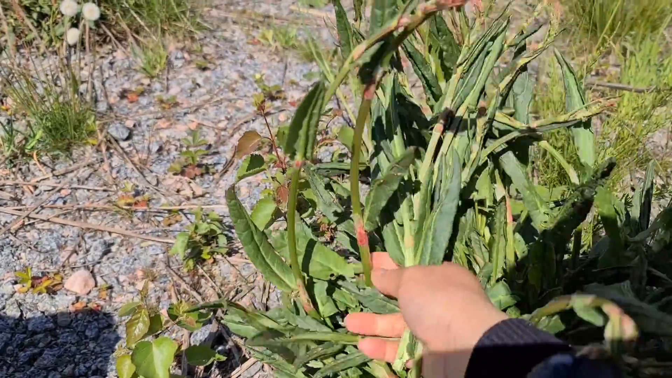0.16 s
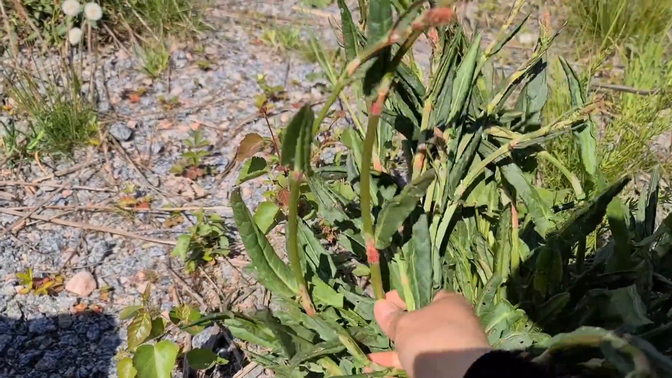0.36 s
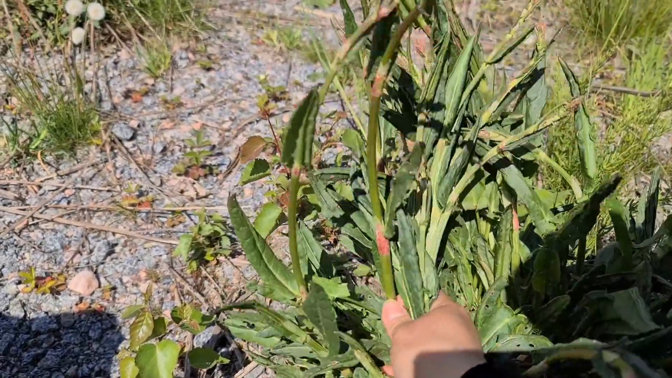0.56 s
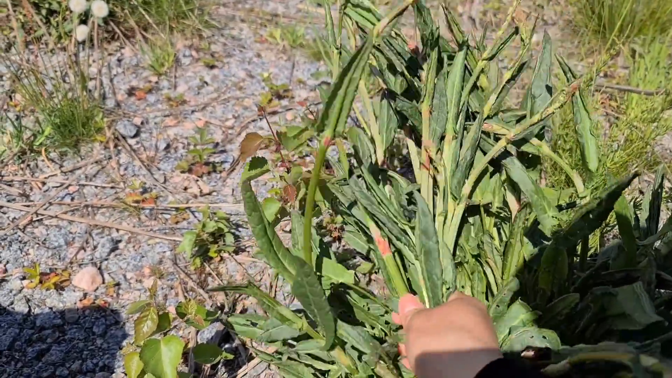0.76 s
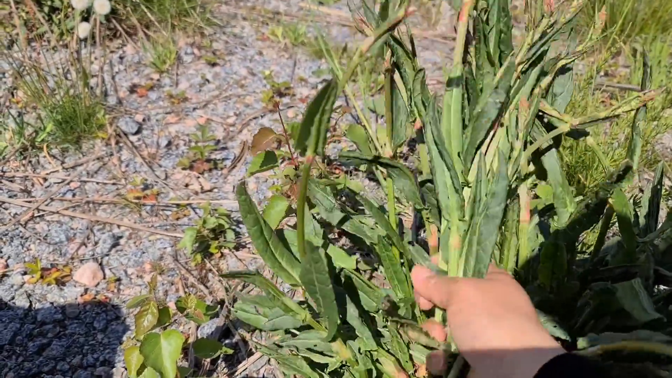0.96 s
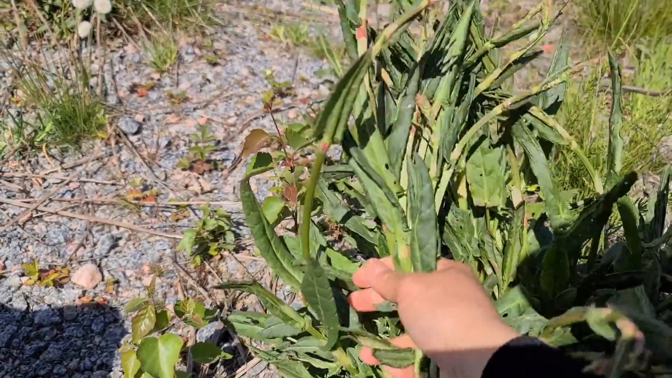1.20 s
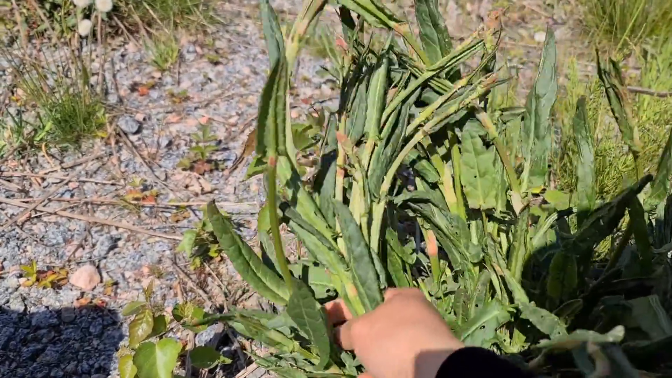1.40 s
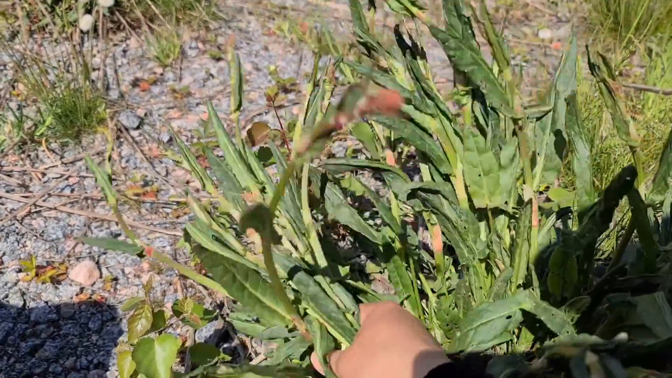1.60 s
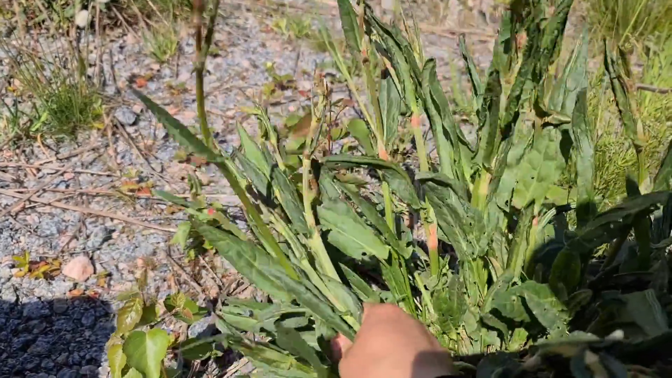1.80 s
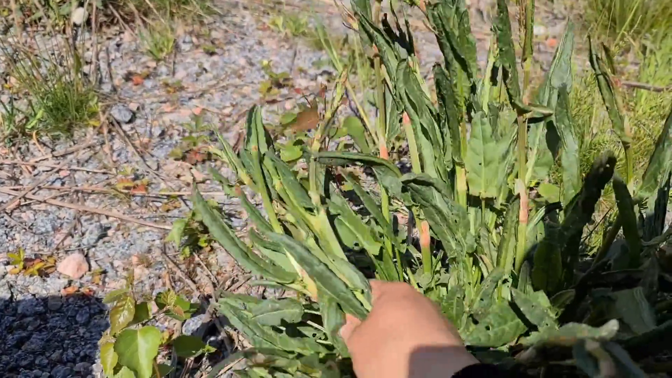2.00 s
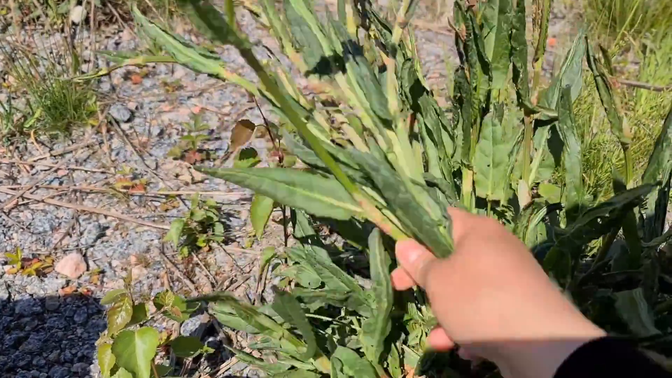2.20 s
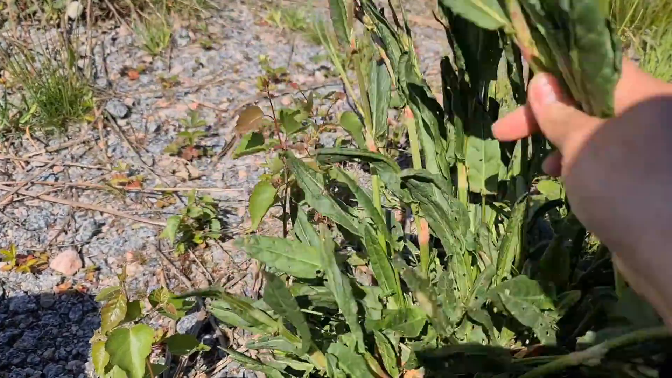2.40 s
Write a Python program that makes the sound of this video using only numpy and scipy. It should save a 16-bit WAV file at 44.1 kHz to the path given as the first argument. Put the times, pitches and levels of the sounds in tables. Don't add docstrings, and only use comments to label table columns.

```python
import sys
import numpy as np
from scipy import signal
from scipy.fft import rfft, irfft
from scipy.io import wavfile
from scipy.ndimage import uniform_filter1d

SR = 44100
rng = np.random.default_rng(int(sys.argv[2]) if len(sys.argv) > 2 else 0)


def wav_out(sig):
    wavfile.write(sys.argv[1], SR, np.round(np.clip(np.atleast_2d(sig).T, -1, 1) * 32767).astype(np.int16))


def convert_level_to_amplitude(level_db):
    exponent = np.asarray(level_db, float) / 20
    return 10 ** exponent


N = 110250

# pitch_hz, level_db (per Hz)
TRAFFIC_SPECTRUM = [(30, -17.5), (52, -3), (160, -3.5), (300, -11.5), (480, -12), (1000, -25.5),
                    (2000, -25), (3200, -43.5)]
# pitch_hz, level_db (per Hz)
FOLIAGE_SPECTRUM = [(2000, -6), (3500, 8), (5000, -1), (7000, -24), (9000, 3), (11000, -1), (13000, -10),
                    (15000, -17.5)]
# peak_s, rise_s, fall_s, level_db, tilt_db (per octave)
BRUSHES = [(0.102, 0.083, 0.3, -62, 3.5), (.21, 0.028, 0.041, -58, -1.5), (.34, 0.022, 0.015, -50, 1.5),
           (0.736, 0.021, 0.015, -38, 4), (.78, 0.029, 0.0081, -48, -0.5), (.88, 0.025, 0.013, -47.5, -0.5),
           (1.03, 0.042, 0.07, -57, -3.5), (1.51, .05, 0.058, -54.5, -5.5), (1.6, 0.042, 0.032, -45, 2),
           (1.69, 0.035, 0.047, -65, -14.5), (1.84, 0.041, 0.014, -55.5, -1),
           (1.89, 0.018, 0.033, -57.5, -4.5), (1.939, 0.015, 0.027, -53.5, -6),
           (2.14, 0.043, .04, -48, -0.5), (2.2, 0.018, 0.088, -60, -11), (2.26, 0.022, 0.027, -46, 2.5),
           (2.362, 0.023, 0.013, -50, -0.5)]
# start_s, level_db, length_s, left_right_db
TICKS = [(0.247, -51, 0.0017, 1), (0.261, -39, 0.0013, 3.5), (.315, -50, 0.0031, -2),
         (0.33, -66, 0.0018, -1.5), (0.703, -37.5, 0.0041, -7), (0.728, -49, 0.0025, -3),
         (0.742, -53, 0.0034, -11), (0.896, -49, 0.0036, 0.5), (1.034, -50.5, 0.001, -6),
         (1.078, -57, 0.0049, -1), (1.124, -64, .004, 2), (1.524, -57, 0.00094, -2),
         (1.61, -54, 0.0017, -10), (1.762, -44, 0.0011, 4), (1.783, -57, 0.0021, 4),
         (1.916, -48, 0.0026, 7), (2.058, -37, 0.0036, 3.5), (2.138, -52, 0.0024, 10),
         (2.268, -53, 0.003, 9), (2.371, -50, 0.0038, 6)]
# pitch_hz, level_db (per Hz)
LEAF_SPECTRUM = [(1470, -21), (2500, -5.5), (3300, -7.5), (4800, -5.5), (7170, -7), (8950, -1.5),
                 (15500, -8.5)]
# start_s, level_db, pitch_factor, left_right_db, push_length_factor
THICK_POP = [(.2429, 0.69, 1.007, -1.64, 1.045)]
# pitch_hz, level_db, t60_s, left_right_db
THICK_STEM = [(276, -20, 0.049, -6), (505, -1.5, 0.021, 1.5), (762, 4.5, 0.0078, 1.5),
              (1113, -5, 0.013, -2), (1228, 4.5, 0.01, -2), (1540, -7.5, 0.019, 0), (2066, -2.5, 0.012, 2),
              (2940, 6, 0.0095, 3.5)]
# start_s, level_db, pitch_factor, left_right_db, push_length_factor
THIN_POPS = [
    (0.2935, -35.5, 0.81, 1, .6),
    (1.0744, -20, 0.98, 4, 0.46),
    (1.117, -38.5, 0.61, 4, 0.7),
    (1.6745, -17.5, 0.96, 3, 0.91),
    (1.7244, -14.5, 0.93, 3.5, 0.61),
    (1.7595, -11, 1, 6, 1.14),
]
# pitch_hz, level_db, t60_s, left_right_db
STEM = [(1250, -16.5, .0094, 0), (2060, 7.8, .0053, -1), (2900, -6, .017, 0)]
# pitch_hz, level_db, t60_s, left_right_db
THIN_STEMS = [
    STEM,
    [(1220, 0.5, 0.011, -6), (1664, 1, 0.016, 1.5), (2350, -4.5, .011, 6), (2990, -12.5, 0.013, -2), (3740, -11, 0.009, -11)],
    STEM,
    [(1450, -5, .006, 9), (2070, 4, 0.0092, 1), (1810, -10, 0.017, -4), (2410, -11, .007, 4)],
    [(1010, -14, 0.0046, 3), (1720, 1, 0.0066, -0.5), (2120, -0.5, .008, 2.5), (2940, -6, 0.0088, 0)],
    [(1340, -15, 0.0051, 0), (1930, 4, 0.004, -4), (2250, -2.5, 0.0077, 1.5), (3060, -1, 0.011, 5)],
]
# start_s, level_db, fibre_burst_s, left_right_db
CRACKS = [
    (0.6896, -10.5, 0.0021, 3),
    (1.8672, -11.5, 0.0028, 8.5),
]
# pitch_hz, level_db, t60_s, left_right_db
FIRST_STALK = [(1045, -2, 0.048, -7.5), (2370, -2, 0.0207, -3), (4840, 5, 0.02, -1.5),
               (5500, -10.5, .013, 3), (6550, -5, .018, 7), (8210, 5.5, 0.036, -5), (9100, -8, .03, 1.5),
               (9800, -4.5, .03, 4), (11720, 4, 0.018, 4), (12500, -10, .012, -4), (14500, -18, .008, 0)]
SECOND_STALK = [(1084, -28, 0.0154, -3), (1525, -2, 0.031, 3), (2380, -15, .02, -3), (3100, -6, .015, -9),
                (3780, -8, 0.009, 7.5), (4550, -4, 0.011, 8), (7500, 3, .014, -2), (8970, 1, 0.032, -4),
                (10080, -1, 0.027, 0), (10900, -6, 0.033, 0), (11740, 2.5, 0.035, 0),
                (13300, -3.5, .012, -8), (15300, 1, 0.019, -4)]
# pitch_hz, level_db (per Hz)
FIRST_SNAP = [(120, -35), (300, -15), (2290, 0.5), (4800, -8), (7410, -2), (8120, -1.5), (11300, -6),
              (16000, -44)]
SECOND_SNAP = [(59, -36), (500, -5), (1300, 0), (4670, -0.5), (5900, -16.5), (10900, -7.5), (15000, -12),
               (16000, -9.5)]
# after_crack_s, level_db, left_right_db
PARTINGS = [
    [(.0002, 10.5, -1), (.0006, 17, 0.5), (.0015, 4.5, 5.5), (.0028, 6, -10), (.004, 0, -7.5)],
    [(.0005, 14, 3.5), (.0009, 10, 0.5), (.0017, 10, 6), (.0034, 4, 0)],
]
# pitch_hz, level_db (per Hz)
SKIN_SPECTRUM = [(2500, -21), (4000, -0.5), (7000, -5), (11000, 0.5), (15000, -15)]
# start_s, level_db, length_s
CHIRPS = [(1.811, -57, .044), (1.996, -56, .035), (2.183, -54, .035), (2.373, -55, .042)]


def walk(rate_hz):
    hold = max(int(SR / rate_hz), 1)
    steps = np.repeat(rng.standard_normal(N // hold + 1), hold)
    return 1.16 * uniform_filter1d(uniform_filter1d(steps, hold), hold)[:N]


def colour(x, spectrum):
    n, points = x.shape[-1], np.array(spectrum)
    octave = np.log2(np.fft.rfftfreq(n, 1 / SR) + 1)
    edge = np.log2(points[:, 0])
    beyond = abs(octave - np.clip(octave, edge[0], edge[-1]))
    y = irfft(rfft(x) * convert_level_to_amplitude(np.interp(octave, edge, points[:, 1]) - 4.6 * beyond), n)
    return y / np.std(y)


def pan(db):
    return convert_level_to_amplitude(np.array([[db], [-db]]) / 2)


def ring(modes, pitch=1, left_late_s=.0001):
    m = np.array(modes)
    t = np.arange(2048) / SR - np.array([[left_late_s], [0]])
    t = np.maximum(t, 0)[:, None]
    gain = convert_level_to_amplitude(m[:, 1] + m[:, 3] * np.array([[.5], [-.5]]))[..., None]
    tone = np.sin(2 * np.pi * pitch * m[:, :1] * t)
    return (gain * tone * 1000. ** (-t / m[:, 2:3])).sum(1)


def add(out, start_s, x):
    i = int(start_s * SR)
    out[:, i:i + x.shape[1]] += x[:, :N - i]


def traffic():
    f = np.fft.rfftfreq(N, 1 / SR) + 1
    mid, side = rfft(colour(rng.standard_normal((2, N)), TRAFFIC_SPECTRUM))
    width = np.clip(f / 2780, .03, 1) ** .5
    both = mid + side * width * np.array([[1], [-1]])
    octave = np.log2(f / 30)
    swell_db = 2.44 * walk(1.5) + 0.04 * np.arange(N) / SR
    out = np.zeros((2, N))
    for k in range(11):
        band = irfft(both * np.clip(1 - abs(octave - k), 0, 1), N)
        out += band * convert_level_to_amplitude(swell_db + 2.1 * walk(6.11))
    return out * convert_level_to_amplitude(-44) / np.std(out.mean(0))


def far_leaves():
    return convert_level_to_amplitude(-68 + 0.45 * walk(3.2)) * colour(rng.standard_normal((2, N)), FOLIAGE_SPECTRUM)


def near_leaves():
    t = np.arange(N) / SR
    alike = 0.13
    swells = []
    for peak_s, rise_s, fall_s, db, _ in BRUSHES:
        slope_s = np.where(t < peak_s, rise_s, fall_s)
        swells.append(convert_level_to_amplitude(2 * db) * np.exp(-(abs(t - peak_s) / slope_s) ** 1.31))
    swells, tilt_db = np.array(swells), np.array(BRUSHES)[:, 4]
    ticks = np.zeros((2, N))
    for start_s, db, length_s, lr in TICKS:
        ticks += convert_level_to_amplitude(db) * pan(lr) * np.exp(-((t - start_s) / length_s) ** 2)
    grains = np.sqrt(alike) * rng.standard_normal(N) + np.sqrt(1 - alike) * rng.standard_normal((2, N))
    grains = grains * convert_level_to_amplitude(3 * walk(660))
    spectrum = rfft(colour(grains, LEAF_SPECTRUM))
    flicker = convert_level_to_amplitude(0.95 * walk(59.52))
    place = 4 * np.log2((np.fft.rfftfreq(N, 1 / SR) + 1) / 8000)
    out = np.zeros((2, N))
    for k in range(-10, 5):
        brush = np.sqrt(convert_level_to_amplitude(2 * tilt_db * k / 4) @ swells) * flicker * pan(1)
        patch = convert_level_to_amplitude(1.8 * walk(70))
        level = (brush + ticks * convert_level_to_amplitude(-.5 * k / 4)) * patch
        out += level * irfft(spectrum * np.clip(1 - abs(place - k), 0, 1), N)
    return out


def pop(out, event, modes, push_s, swings, left_late_s):
    start_s, db, pitch, lr, push_factor = event
    u = (np.arange(128) - start_s * SR % 1) / SR / push_s / push_factor
    u = np.clip(u, 0, 1)
    bell = np.sin(np.pi * u) ** 2
    give = bell * np.cos(np.pi * swings * u)
    push = give - bell * give.sum() / bell.sum()
    x = signal.fftconvolve(ring(modes, pitch, left_late_s), push[None])
    x = x / abs(x).max()
    add(out, start_s, x * convert_level_to_amplitude(db) * pan(lr))
    add(out, start_s + 0.00114 / pitch, x[::-1] * convert_level_to_amplitude(db - 18) * pan(lr))


def pops():
    out = np.zeros((2, N))
    for event in THICK_POP:
        pop(out, event, THICK_STEM, push_s=0.00073, swings=1.22, left_late_s=.0001)
    for event, modes in zip(THIN_POPS, THIN_STEMS):
        pop(out, event, modes, push_s=0.0012, swings=5 * event[4], left_late_s=.00007)
    return out


def cracks():
    out, t = np.zeros((2, N)), np.arange(-1500, 2500) / SR
    stalks = zip(CRACKS, (FIRST_STALK, SECOND_STALK), (FIRST_SNAP, SECOND_SNAP), PARTINGS)
    for (start_s, db, burst_s, lr), modes, snap, partings in stalks:
        creak = convert_level_to_amplitude(-21) * np.exp(t / 0.0051)
        burst = np.exp(-(abs(t) / burst_s) ** 2)
        hiss = convert_level_to_amplitude(-15) * np.exp(-t / 0.0037)
        shape = np.where(t < 0, creak, burst + hiss)
        fibres = rng.standard_normal((3, len(t))) * convert_level_to_amplitude(3.1 * rng.standard_normal(len(t)))
        fibres = fibres[0] + convert_level_to_amplitude(3.5) * fibres[1:]
        force = signal.lfilter([1, -.75], 1, shape * fibres)
        for k, (after_s, click_db, side_db) in enumerate(partings):
            force = force + (-1) ** k * convert_level_to_amplitude(click_db) * pan(side_db) * np.sinc((t - after_s) * SR)
        damped = np.array(modes) * [1, 1, .42, 1]
        x = signal.fftconvolve(force, ring(damped), axes=1)[:, :len(t)]
        x = x / np.std(x) + convert_level_to_amplitude(4) * colour(force, snap)
        peak = np.sqrt(np.max(uniform_filter1d(x ** 2, size=88)))
        add(out, start_s + t[0], x / peak * convert_level_to_amplitude(db) * pan(lr))
    return out


def skin_split():
    out = np.zeros((2, N))
    x = colour(np.sinc(np.arange(-128, 128)), SKIN_SPECTRUM)
    add(out, 1.7605 - 128 / SR, x / abs(x).max() * convert_level_to_amplitude(-21.5) * pan(11))
    return out


def bird():
    out, t = np.zeros((2, N)), np.arange(4096) / SR
    from_hz, to_hz, echo_s, echo_db = 3620, 2680, .015, -8
    for start_s, db, length_s in CHIRPS:
        u = np.clip(t / length_s, 0, 1)
        hz = from_hz + (to_hz - from_hz) * u
        whistle = np.sin(np.pi * u ** 1.38) * np.sin(2 * np.pi * np.cumsum(hz) / SR)
        x = 1.83 * convert_level_to_amplitude(db) * whistle * pan(2)
        echoes = rng.standard_normal((2, len(t))) * np.exp(-t / echo_s)
        echoes = echoes / np.sqrt(np.sum(echoes[0] ** 2))
        add(out, start_s, x + convert_level_to_amplitude(echo_db) * signal.fftconvolve(x, echoes, axes=1)[:, :len(t)])
    return out * convert_level_to_amplitude(2.0 * walk(150))


def scene():
    return traffic() + far_leaves() + near_leaves() + pops() + cracks() + skin_split() + bird()


def band_limit(x):
    return signal.sosfilt(signal.butter(12, 16810, fs=SR, output="sos"), x)


def record(dry):
    x = signal.sosfilt(signal.butter(2, 15.3, "high", fs=SR, output="sos"), dry)
    x = np.clip(x, -1, 1)
    x = signal.sosfilt(signal.cheby1(10, 1, 15500, fs=SR, output="sos"), x)
    return band_limit(x)


dry = scene()
out = record(dry)
wav_out(out)
```